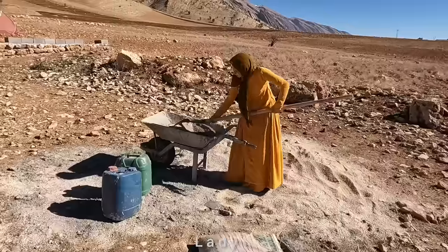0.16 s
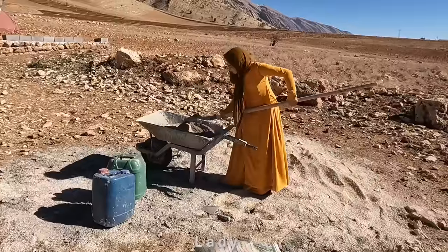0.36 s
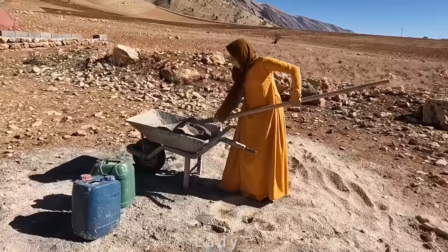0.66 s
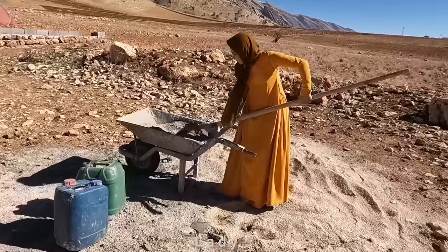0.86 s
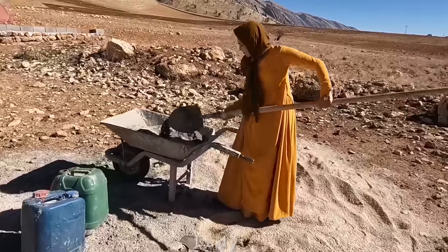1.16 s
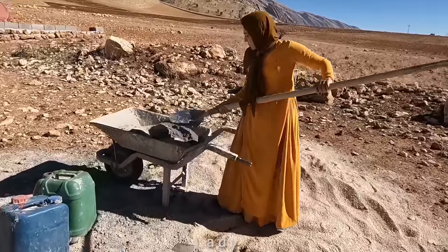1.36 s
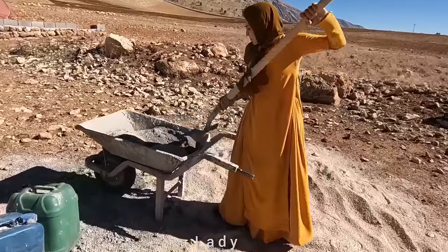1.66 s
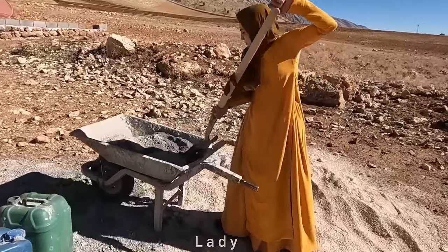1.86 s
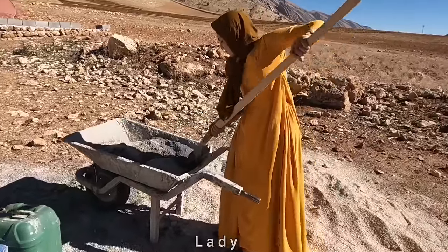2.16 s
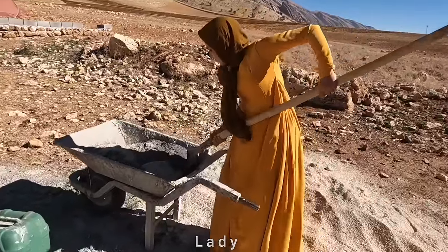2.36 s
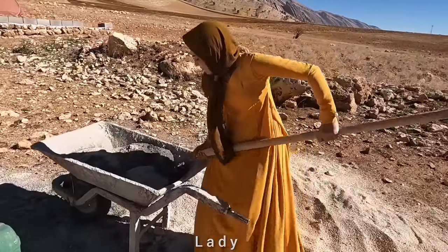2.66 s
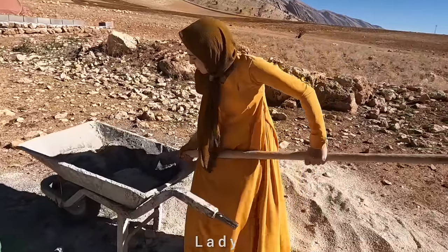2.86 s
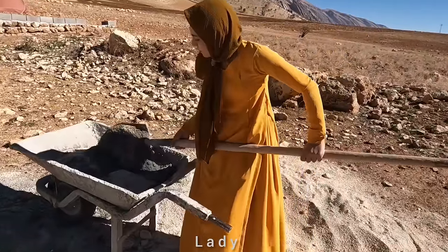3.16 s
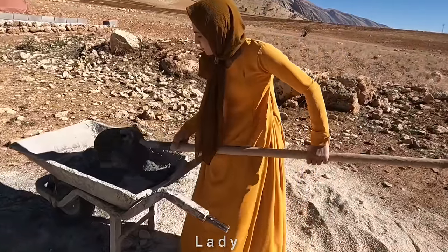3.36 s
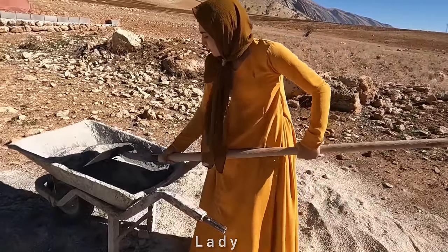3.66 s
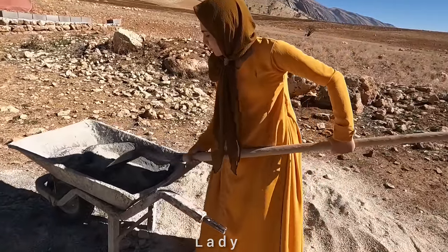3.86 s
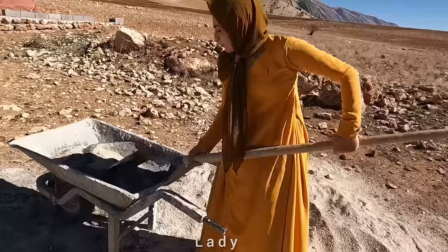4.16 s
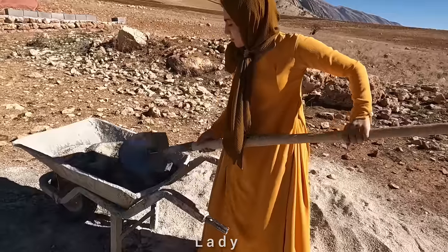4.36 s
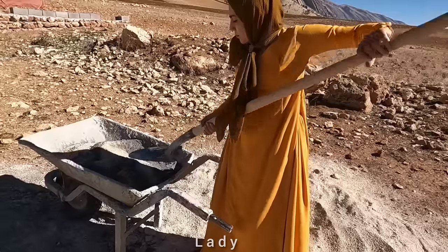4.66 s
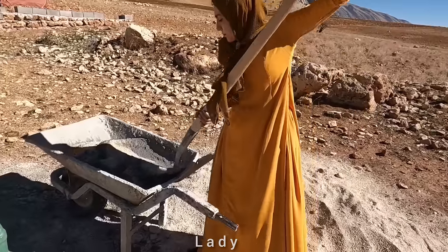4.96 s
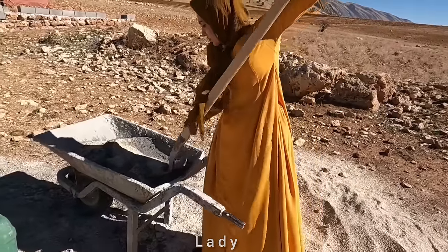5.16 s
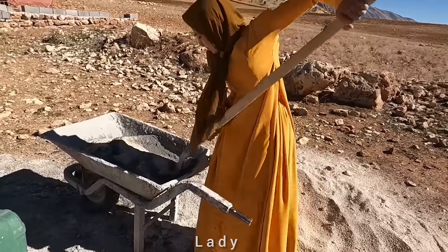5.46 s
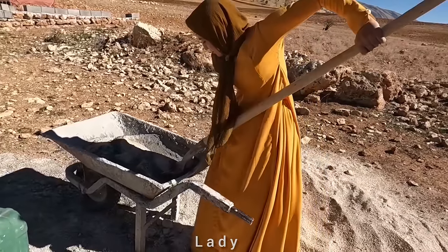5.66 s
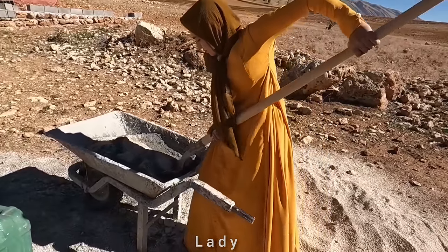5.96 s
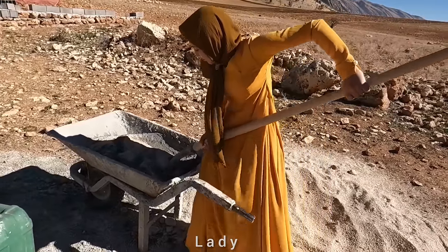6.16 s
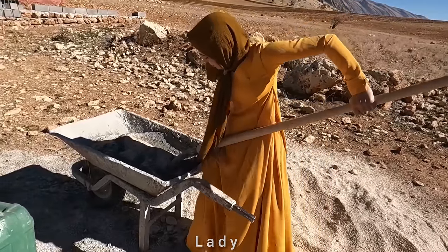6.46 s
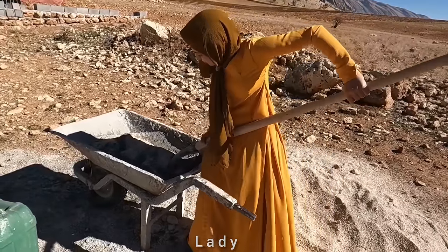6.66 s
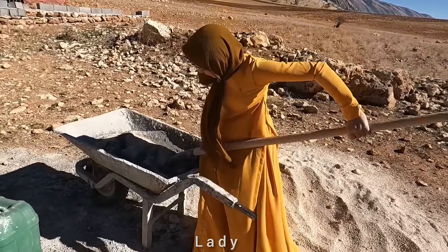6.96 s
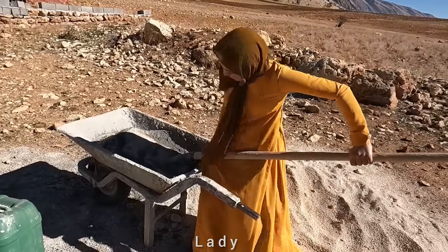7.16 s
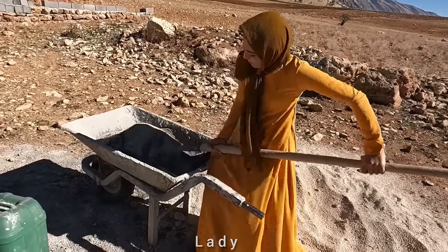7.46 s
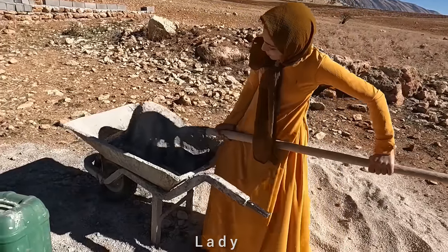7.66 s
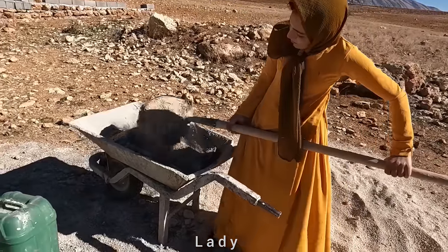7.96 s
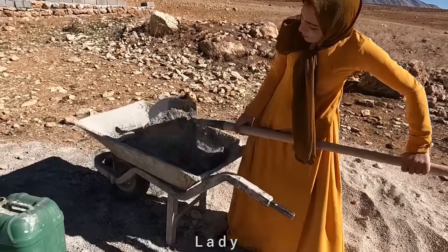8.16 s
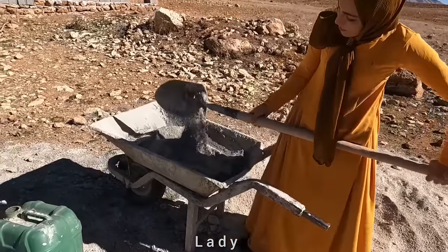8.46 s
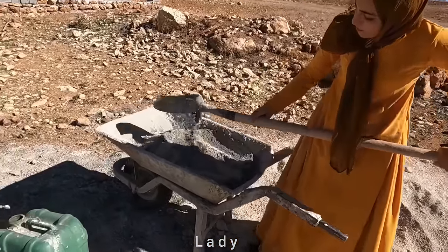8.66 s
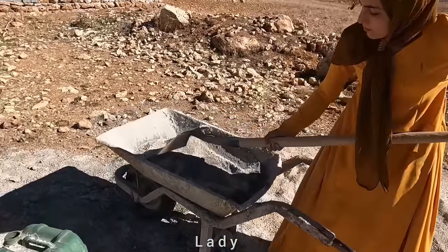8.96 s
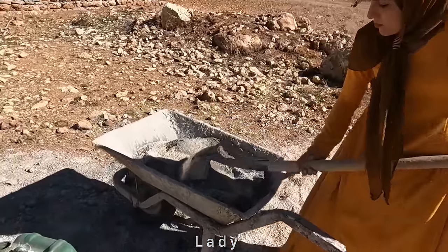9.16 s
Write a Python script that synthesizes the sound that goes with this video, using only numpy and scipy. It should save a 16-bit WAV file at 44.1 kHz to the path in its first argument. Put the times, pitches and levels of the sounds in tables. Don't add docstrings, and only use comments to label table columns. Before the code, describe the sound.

A steel shovel scrapes and crunches through gritty sand and cement in a metal wheelbarrow outdoors, with wind thumps and a faint low engine drone.

```python
import sys
import numpy as np
from scipy import signal
from scipy.fft import rfft, irfft, next_fast_len
from scipy.io import wavfile

SR = 44100
rng = np.random.default_rng(int(sys.argv[2]) if len(sys.argv) > 2 else 0)


def wav_record(signal):
    frames = np.transpose(np.atleast_2d(signal))
    bounded = np.clip(frames, -1, 1)
    quanta = np.round(bounded * 32767).astype(np.int16)
    wavfile.write(sys.argv[1], SR, quanta)


def magnitude_from_level(level_db):
    exponent = np.asarray(level_db, float) / 20
    return 10 ** exponent


N = 410571


# (start t/s, bite t/s, hold t/s, level/dB, swell over the hold/dB)
STROKES = [(-.02, 0.011, .23, -51.5, -3.5), (.255, 0.075, 0.086, -49, -4), (.45, 0.069, 0.099, -51, 0),
           (.69, 0.038, 0.11, -56, 2), (.86, .06, .09, -53, 2), (1.59, 0.011, 0.013, -59.5, 5.5),
           (1.85, 0.1, 0.12, -45, -0.5), (2.135, 0.04, 0.027, -54.5, -8), (2.22, 0.027, 0.28, -51, -2),
           (2.57, 0.062, 0.23, -50.5, -14), (3.17, 0.25, 0.11, -51.5, -9.5), (3.52, 0.077, 0.13, -46.5, -8),
           (3.75, 0.071, .08, -47, -1), (3.93, 0.13, 0.073, -43.5, -7), (4.15, .13, 0.045, -49.5, -2),
           (4.555, 0.0071, 0.018, -55, -30), (5.009, 0.0048, 0.23, -49, 4), (5.58, 0.025, 0.19, -62, -6.5),
           (5.82, 0.15, 0.073, -68, 3), (6.01, .11, 0.035, -47.5, 3.5), (6.69, .14, .09, -59, 1),
           (8.931, 0.0036, .01, -45.5, -1), (8.942, 0.0032, 0.03, -36.5, -5.5),
           (9.0, 0.013, 0.057, -46, -0.5), (9.07, .01, 0.16, -50.5, -6.5), (9.21, 0.059, 0.051, -40, 5.5)]


def stroke_gain():
    return efforts(STROKES, fall_db_per_s=799)


# (start t/s, bite t/s, hold t/s, level/dB, swell over the hold/dB)
SLIDES = [(0.95, 0.025, 0.51, -52.5, -20), (1.62, 0.039, 0.25, -74, -6), (2.804, 0.09, 0.55, -67.5, 1.5),
          (3.71, 0.072, 0.61, -59.5, -3), (4.293, 0.041, 0.24, -61.5, -0.5), (4.66, 0.17, 0.32, -77.5, 5),
          (2.08, 0.029, 0.13, -61.5, 1), (5.256, 0.049, 0.28, -74.5, 3.5), (6.148, 0.021, 0.1, -49, -15.5),
          (6.928, 0.052, 0.35, -66.5, -9), (7.4, 0.09, .17, -82, 5), (7.619, 0.21, 0.17, -66, -1),
          (7.915, 0.37, .26, -52, -6), (8.45, 0.11, 0.42, -60.5, -6)]


def slide_gain():
    return efforts(SLIDES, fall_db_per_s=250)


# (f/Hz, level per Hz/dB)
GRIT_SPECTRUM = [(500, -30), (800, -17.5), (1300, -0.5), (2400, 1.5), (3500, -1), (5200, 0.5), (7000, -2),
                 (7700, -4), (8300, -11), (9700, -8), (10800, -17), (12500, -19), (15500, -39)]
# (f/Hz, width/Hz, level/dB)
BLADE_MODES = [(2230, 65, -5), (3800, 20, 1), (3840, 210, -9), (5960, 26, -24), (7900, 1000, -2)]


def grit():
    sand = grains(14000 * magnitude_from_level(1.5 * drift(43)), spread_db=3.5)
    modes = ringing(sand, 1800, 7800, cycles=30.0, count=20, patchy_db=5.0)
    sand = rms_one(sand) + 0.65 * rms_one(modes)
    pressed = colour(sand + 0.63 * resonances(sand, BLADE_MODES), GRIT_SPECTRUM)
    dull = signal.butter(1, 6500, fs=SR, output="sos")
    loose = signal.sosfilt(dull, pressed[::-1])
    return magnitude_from_level(0.5) * (stroke_gain() * rms_one(pressed) + slide_gain() * rms_one(loose))


# (start t/s, length t/s, crunch level/dB, tray rumble level/dB)
LUMPS = [(.482, 0.055, -46, -51), (.908, 0.12, -38.5, -54), (.975, 0.16, -40.5, -45.5),
         (1.597, 0.051, -44, -53), (2.064, 0.044, -32, -36), (2.155, 0.1, -39.5, -43.5),
         (2.245, 0.12, -38.5, -39), (2.338, 0.05, -39, -38), (2.41, 0.035, -44, -39),
         (2.45, .035, -38, -44), (2.5, 0.059, -38.5, -44), (2.645, 0.047, -34, -33.5),
         (2.687, 0.037, -41, -37.5), (2.707, 0.042, -49, -41), (2.748, 0.11, -42.5, -43),
         (5.228, 0.03, -40, -44), (5.545, 0.032, -55, -52), (5.62, .04, -47.5, -43.5),
         (5.67, 0.026, -64, -53), (6.11, 0.17, -44, -45), (2.608, 0.045, -42, -48), (7.03, 0.059, -57, -60),
         (8.23, 0.058, -45, -41.5), (8.44, 0.02, -50, -45.5), (8.52, 0.062, -48, -49),
         (8.66, 0.049, -59, -48), (8.929, 0.063, -47, -43), (9.04, 0.051, -44, -63)]
# (start t/s, length t/s, crunch level/dB, tray rumble level/dB)
CHURNS = [(-.2, 0.87, -50, -57), (.48, 0.14, -47, -57), (.68, 0.2, -49, -77), (1.86, 0.3, -60, -50),
          (2.34, .045, -42, -41), (2.85, 0.77, -48.5, -56), (3.53, 0.15, -46, -52), (3.76, 0.41, -50, -60),
          (3.93, 0.18, -52, -54), (4.17, 0.21, -53, -66), (4.98, 0.24, -57, -78), (5.58, 0.2, -57, -51),
          (5.92, 0.087, -46.5, -50), (6.72, 0.23, -40, -47), (6.9, 0.39, -57.5, -59),
          (7.95, 0.55, -48.5, -56), (9.225, 0.072, -46, -32)]


def lump_gain(column):
    rows = []
    for table, bite_share, sag_db in [(LUMPS, 0.1, -9.5), (CHURNS, 0.56, -5.5)]:
        for start, length, *levels_db in table:
            bite, hold = length * bite_share, length * (1 - bite_share)
            rows.append((start, bite, hold, levels_db[column], sag_db))
    return efforts(rows, fall_db_per_s=493)


# (crunch level/dB, rumble level/dB)
LUMPS_IN_SAND_DB = (-4, -12)
# (f/Hz, level per Hz/dB)
CRUNCH_SPECTRUM = [(500, -28), (800, -3.5), (1300, 7), (2200, 1), (3000, -2), (4200, -6.5), (6000, -42)]


def lumps():
    carried = np.hypot(stroke_gain(), slide_gain())
    crunch_gain, rumble_gain = [np.hypot(lump_gain(k), magnitude_from_level(db) * carried)
                                for k, db in enumerate(LUMPS_IN_SAND_DB)]
    breaks = grains(2500 * magnitude_from_level(4.5 * drift(28)), spread_db=-0.5)
    modes = ringing(breaks, 503, 4020, cycles=11.5, count=14, patchy_db=3.0)
    crunch = colour(rms_one(breaks) + 0.7 * rms_one(modes), CRUNCH_SPECTRUM)
    rumble = band(breaks, 201, 877) * magnitude_from_level(2.3 * drift(27))
    return magnitude_from_level(-7.0) * crunch_gain * rms_one(crunch) + magnitude_from_level(-7.5) * rumble_gain * rms_one(rumble)


# (start t/s, length t/s, level/dB, f/Hz, width/Hz)
SINGING = [(.02, 0.037, -55, 3560, 200), (0.523, 0.15, -59, 2270, 350), (2.068, 0.033, -43, 2950, 1200),
           (2.24, .08, -55, 2350, 400), (3.55, 0.11, -55, 4080, 400), (3.8, .1, -61, 2800, 500),
           (4.009, 0.11, -55, 2250, 500), (4.23, 0.13, -59, 2380, 400), (4.927, 0.11, -67, 2298, 902),
           (5.096, 0.056, -54, 2300, 300), (5.941, 0.054, -53, 1270, 500), (6.12, 0.054, -53, 2350, 350),
           (1.595, .04, -48, 1350, 600), (2.8, .2, -63, 2270, 1490), (5.238, .02, -48, 701, 300),
           (5.288, 0.19, -70, 2170, 900), (7.06, .012, -56.5, 600, 600), (7.4, .32, -67, 961, 90),
           (8.14, 0.29, -54.5, 2330, 350), (8.235, 0.041, -52, 700, 400), (8.508, 0.065, -60, 1050, 500),
           (8.577, 0.085, -61, 1080, 600), (8.662, 0.033, -57, 594, 400), (9.031, .045, -49, 1340, 596),
           (9.24, .07, -43, 290, 120)]


def singing():
    out = np.zeros(N + SR)
    sand = grains(3000, spread_db=3.5)
    for s, length, db, hz, width in SINGING:
        i, count = round(s * SR), round(length * SR)
        mode = resonances(sand[i:i + count], [(hz, width, 0)])
        mode = resonances(mode, [(hz, 2 * width, 0)])
        out[i:i + count] += magnitude_from_level(db) * np.sqrt(np.hanning(count)) * rms_one(mode)
    return out[:N]


# (peak t/s, peak level/dB, f/Hz, spread/octave)
TICKS = [(.2056, -40, 1110, 0.76), (.4873, -29, 1180, .5), (.9115, -32, 1700, 1), (.9294, -38, 1680, .8),
         (.9798, -30, 1470, 0.86), (1.0295, -38, 1280, .9), (1.0601, -37, 3100, 1.4),
         (1.0699, -29, 2600, 1.54), (1.1018, -43, 1640, .9), (1.1591, -37, 1270, 0.88),
         (1.5985, -40, 1300, 0.83), (1.6065, -40, 1300, 0.56), (1.6171, -34.5, 1420, 0.95),
         (1.627, -40, 2900, .5), (1.6865, -38, 1320, 0.7), (2.0744, -27, 2600, 1.3),
         (2.081, -31, 3200, 1.35), (2.0875, -29, 2800, 0.85), (2.0935, -33, 2004, 1.7),
         (2.1614, -38, 2510, 0.73), (2.1768, -35, 2400, 0.64), (2.1937, -35, 1770, 1.2),
         (2.2525, -37, 2280, 0.52), (2.289, -35, 1200, 0.7), (2.341, -28, 1500, 2.1), (2.611, -38, 1550, 1),
         (2.6463, -25.5, 1570, 0.65), (2.6547, -26, 1500, 1.8), (2.694, -33, 1700, .9),
         (2.7127, -30, 1500, .55), (2.7518, -31.5, 1630, 0.77), (3.6998, -30.5, 3280, 1.1),
         (4.5659, -42, 2530, 0.71), (5.0193, -37, 2880, .9), (5.2402, -29, 4000, 2.2),
         (5.5506, -41, 700, 1.5), (5.936, -43.5, 1390, 1.1), (5.959, -38.5, 955, 1.04),
         (5.9737, -42, 1450, 0.45), (6.1163, -29, 790, 2.1), (7.5319, -51, 1800, 2),
         (7.8148, -48, 3000, 1.1), (8.4418, -33, 2600, 1.01), (8.535, -43, 1000, .9),
         (8.5606, -36, 990, 1.47), (8.6601, -37.5, 1201, 2.4), (8.7062, -46, 1770, 1.3),
         (8.9465, -21, 3800, 1.5), (9.2481, -30.5, 1410, 1.2)]
STRAYS_S = [1.643, 1.735, 1.822, 5.336, 5.375, 5.42, 5.73, 6.67, 7.973, 8.899]
# (peak level/dB, f/Hz, spread/octave)
STRAY = (-54.5, 4500, 1.4)


def ticks():
    out, t = np.zeros(N + SR), np.arange(SR // 40) / SR
    hits = TICKS + [(s, *STRAY) for s in STRAYS_S]
    noise = rng.standard_normal((len(hits), len(t)))
    for (s, db, hz, octaves), burst in zip(hits, noise):
        contact = np.sign(burst[0]) * (t == 0) + 0.07 * burst * np.exp(-t / 0.003)
        edge = 2 ** (max(octaves, 0.2) / 2)
        tick = band(contact, hz / edge, min(hz * edge, 9000))
        tick = tick + 0.22 * band(contact, 2200, 7500)
        first = round(s * SR) - np.abs(tick).argmax()
        out[first:][:len(t)] += magnitude_from_level(db - 1.0) * tick / np.abs(tick).max()
    return out[:N]


# (f/Hz, level/dB, t60/s)
TRAY_MODES = [(700, -2, .03), (2290, 0, .035), (2840, -8, .025), (4970, -8, .02)]
# (t/s, peak level/dB)
CLANKS = [
    (5.230, -31),
    (9.290, -33),
]


def clanks():
    out, t = np.zeros(N + SR), np.arange(SR // 5) / SR
    contact = rng.standard_normal((len(CLANKS), len(t))) * t * np.exp(-t / 0.0035)
    modes = [(hz, 2.2 / t60, level_db) for hz, level_db, t60 in TRAY_MODES]
    for (s, db), push in zip(CLANKS, contact):
        ring = resonances(push, modes)
        out[round(s * SR):][:len(t)] += magnitude_from_level(db) * ring / np.abs(ring).max()
    return out[:N]


# (t/s, firing f/Hz, drone level/dB, clatter level/dB)
ENGINE = [(0, 75.26, -59.5, -47.5), (.75, 75.4, -60, -48), (1.25, 75.24, -59.5, -55.5),
          (2, 73.77, -60.5, -50), (2.9, 74.33, -61, -47), (4.2, 70.76, -60, -64), (5.2, 72.2, -59.5, -57.5),
          (6.3, 71.53, -59.5, -74.5), (7.3, 71, -60.5, -64.5), (7.6, 70.96, -59.5, -61),
          (8.2, 70.84, -60.5, -54.5), (9.31, 70.96, -65.5, -58.5)]
# (multiple, level/dB)
DRONE_ORDERS = [(1, 0), (2, -6.5), (3, -10.5), (4, -24), (6, -25.5)]
# (f/Hz, width/Hz, level/dB)
CASING_MODES = [(957, 95, 6.5), (1443, 247, 5), (1270, 3700, -20)]


def engine():
    hz, drone_db, clatter_db = in_time(ENGINE)
    turns = np.cumsum(hz * (1 + 0.0033 * drift(3))) / SR
    drone = 0
    for order, db in DRONE_ORDERS:
        tone = np.sin(2 * np.pi * (round(order) * turns + rng.random()))
        drone = drone + np.sqrt(2) * magnitude_from_level(db + 0.7 * drift(6.6)) * tone
    firing = 0.38 + np.exp(-4.0 * (turns % 1))
    rattle = rng.standard_normal(N) * firing * magnitude_from_level(1.5 * drift(23))
    clatter = rms_one(resonances(rattle, CASING_MODES))
    return magnitude_from_level(drone_db) * drone + magnitude_from_level(clatter_db - 9.0) * clatter


# (t/s, peak level/dB, f/Hz, push +1 or pull -1)
JOLTS = [(0.011, -27, 263, -1), (0.049, -36, 295, -1), (0.052, -27, 187, 1), (0.103, -34, 195, 1),
         (0.505, -40, 96, 1), (0.701, -36, 96.3, -1), (0.712, -31.5, 178, -1), (0.75, -34, 159, -1),
         (0.771, -33, 123, 1), (0.887, -45, 70, 1), (0.8938, -34, 112, -1), (0.9038, -38, 260, 1),
         (0.909, -36.5, 239, -1), (1.84, -41, 78.5, 1), (2.425, -37.5, 233, -1), (2.436, -42, 230, -1),
         (2.928, -38, 187, -1), (2.933, -29, 188, 1), (2.949, -32, 103, -1), (2.962, -33.5, 168, -1),
         (2.975, -33.5, 110, -1), (4.683, -40.5, 70, -1), (5.501, -34, 158, -1), (5.535, -41, 150, -1),
         (5.544, -40, 200, 1), (5.5552, -22, 174, 1), (6.171, -28.5, 240, -1), (6.246, -43.5, 117.0, -1),
         (6.265, -32.5, 163, -1), (6.28, -17.5, 212, 1), (6.2977, -25, 423, -1), (6.305, -34, 180, -1),
         (9.212, -39, 118, 1), (9.272, -35, 274, 1)]


def jolts():
    out, t = np.zeros(N + SR), np.arange(-SR // 20, SR // 20) / SR
    for s, db, hz, push in JOLTS:
        turns = t * hz
        early = np.minimum(turns, 0)
        late = turns - early
        swing = np.cos(2 * np.pi * (0.87 * turns - 0.55 * early ** 2 - 0.054 * late ** 2))
        shape = np.exp(-(early / 0.63) ** 4 - late / 0.83)
        out[round(s * SR):][:len(t)] += np.sign(push) * magnitude_from_level(db) * swing * shape
    dull = signal.lfilter([0.12], [1, -0.88], out)
    left = dull[SR // 20 + 25:][:N]
    right = out[SR // 20:][:N]
    return np.array([left, right]) * magnitude_from_level([[-5.0], [3.2]])


# (full strength t/s, hold t/s, level/dB)
GUSTS = [(0.0, 0.033, -37), (0.284, .03, -48), (0.5, 0.022, -50), (0.7, 0.24, -47.5), (1.16, 0.78, -54.5),
         (1.82, 0.21, -55), (2.428, 0.027, -51), (2.908, 0.046, -45.5), (3.108, 0.19, -60),
         (3.86, 0.044, -48.5), (4.55, 0.013, -54), (4.64, 0.027, -56), (4.96, .02, -56),
         (5.523, 0.25, -51.5), (6.25, 0.032, -43.5), (7.042, 0.024, -50.5), (7.177, 0.36, -54),
         (7.728, 0.043, -51), (8.242, 0.034, -53), (8.68, 0.092, -52.5), (9.032, 0.024, -50),
         (9.204, 0.034, -48)]


def wind():
    rise_s, calm_db = 0.051, -62.5
    rows = [(s - rise_s, rise_s, hold, db, 0) for s, hold, db in GUSTS]
    gusts = efforts(rows, fall_db_per_s=158)
    level_db = 20 * np.log10(np.hypot(gusts, magnitude_from_level(calm_db)))
    shared, own = rng.standard_normal((2, N)) * magnitude_from_level(2.8 * drift(16))
    ports = np.array([0.55 * np.roll(shared, -20) + 0.14 * own, shared - 0.14 * own])
    low, high = rms_one(band(ports, 43, 145.3)), rms_one(band(ports, 80, 410))
    high_db = np.minimum(0.5 * (level_db - 13.0), 0)
    return magnitude_from_level(level_db - 1.0) * (low + high * magnitude_from_level(high_db))


# (f/Hz, level per Hz/dB)
AIR_SPECTRUM = [(20, -20), (50, 11.5), (80, -0.5), (200, -14.5), (350, -9.5), (750, -12.5), (1300, -11),
                (3000, -26.5), (6400, -24), (7700, -34), (8400, -50), (10500, -48), (15700, -47)]


def air():
    mid, side = colour(rng.standard_normal((2, N)), AIR_SPECTRUM)
    side = side + 2.2 * band(side, 11000, 16000)
    return magnitude_from_level(-66.0) * rms_one(np.array([mid + 0.3 * side, mid - 0.3 * side]))


# (f/Hz, level/dB)
TOP = [(7700, 0), (8300, -9), (10500, -14), (11200, -20), (15000, -18)]


def dull_top(x):
    return colour(x, TOP)


# (f/Hz, phase/rad)
LEFT_LEAD = [(0, 0), (260, 0.2), (1030, -0.3), (2760, -0.5), (8100, -0.0)]
# (f/Hz, level/dB)
LEFT_LOUDER = [(60, 0), (200, -1), (1000, -2.5), (4500, -1), (8000, 1), (9500, 4), (13000, -2)]
# (f/Hz, level/dB)
SCATTER = [(150, -28), (400, -15), (1000, -17), (4000, -16), (7000, -14), (9000, -10), (12000, -5)]


def port_pair(x):
    size = next_fast_len(N + 2000)
    hz = np.arange(size // 2 + 1) * SR / size
    tilt = magnitude_from_level(at_hz(LEFT_LOUDER, hz) / 2) * np.exp(0.5j * at_hz(LEFT_LEAD, hz))
    direct = irfft(rfft(x, size) * np.array([tilt, 1 / tilt]), size)[:, :N]
    return direct + colour(x * drift(130), SCATTER) * [[1], [-1]]


def efforts(rows, fall_db_per_s):
    t, power = np.arange(0, N + 20, 20) / SR, 1e-12
    for start, rise, hold, db, swell_db in rows:
        rise, hold = max(rise, 0.002), max(hold, 0.002)
        since = t - start - rise
        fall_db = fall_db_per_s * np.maximum(since - hold, 0)
        level_db = db + swell_db * np.clip(since / hold, 0, 1) - fall_db
        onset = np.clip(1 + since / rise, 0, 1) ** 1.24
        power = power + (onset * magnitude_from_level(level_db)) ** 2
    return np.interp(np.arange(N) / SR, t, np.sqrt(power))


def grains(per_s, spread_db):
    sizes = magnitude_from_level(spread_db * np.minimum(rng.exponential(1, N), 4)) * rng.choice([-1, 1], N)
    return sizes * (rng.random(N) < per_s / SR) + 1e-9


def ringing(clicks, low_hz, high_hz, cycles, count, patchy_db):
    dealt = rng.integers(0, count, N)
    pitches = np.geomspace(low_hz, high_hz, count) * rng.uniform(0.93, 1.04, count)
    free = magnitude_from_level(patchy_db * drift(7.6))
    out = 0
    for k, hz in enumerate(pitches):
        struck = clicks * (dealt == k) * np.roll(free, k * N // count) + 1e-12
        out = out + resonances(struck, [(hz, hz / cycles, 0)]) * np.sqrt(cycles)
    return out


def resonances(x, peaks):
    out = 0
    for k, (hz, width, db) in enumerate(peaks):
        r = np.exp(-np.pi * width / SR)
        top = [(1 - r * r) / 2, 0, (r * r - 1) / 2]
        bottom = [1, -2 * r * np.cos(2 * np.pi * hz / SR), r * r]
        out = out + (-1) ** k * magnitude_from_level(db) * signal.lfilter(top, bottom, x)
    return out


def colour(x, spectrum):
    size = next_fast_len(N)
    hz = np.arange(size // 2 + 1) * SR / size
    return irfft(rfft(x, size) * magnitude_from_level(at_hz(spectrum, hz)), size)[..., :N]


def band(x, low_hz, high_hz):
    return signal.sosfilt(signal.butter(2, [low_hz, high_hz], "band", fs=SR, output="sos"), x)


def drift(rate):
    r = np.exp(-40 * np.pi * rate / SR)
    chance = rng.standard_normal(N // 20 + 2002)
    slow = signal.lfilter([1], [1, -2 * r, r * r], chance)[2000:]
    return np.interp(np.arange(N) / 20, np.arange(len(slow)), rms_one(slow))


def rms_one(x):
    return x / np.sqrt(np.mean(x ** 2) + 1e-20)


def in_time(rows):
    s, *columns = np.transpose(rows)
    return [np.interp(np.arange(N) / SR, s, c) for c in columns]


def at_hz(points, hz):
    p = np.array(points, float)
    return np.interp(np.log(hz + 1), np.log(p[:, 0] + 1), p[:, 1])


def scene():
    barrow = grit() + lumps() + singing() + ticks() + clanks()
    return port_pair(dull_top(barrow) + engine()) + jolts() + wind() + air()


def top_cut(x):
    return signal.sosfilt(signal.butter(12, 15750, fs=SR, output="sos"), x)


def record(dry):
    mix = signal.sosfilt(signal.butter(1, 22, "high", fs=SR, output="sos"), dry)
    return top_cut(mix)


dry = scene()
out = record(dry)
wav_record(out)
```